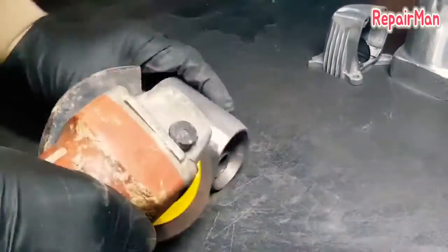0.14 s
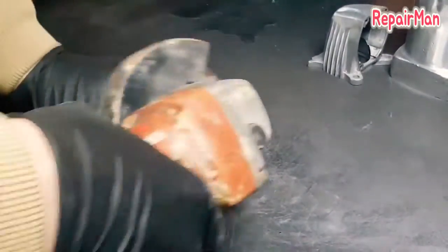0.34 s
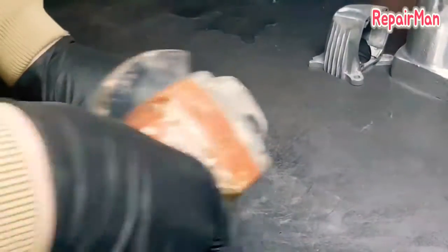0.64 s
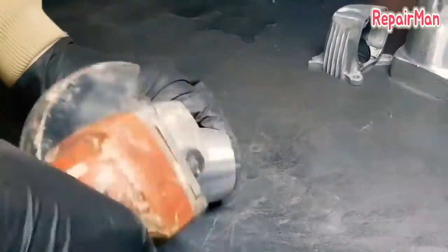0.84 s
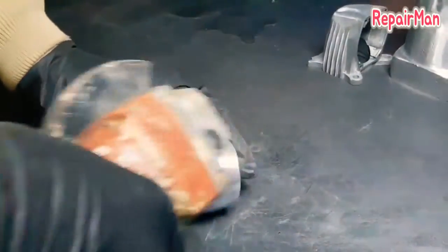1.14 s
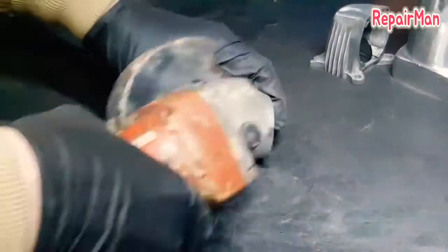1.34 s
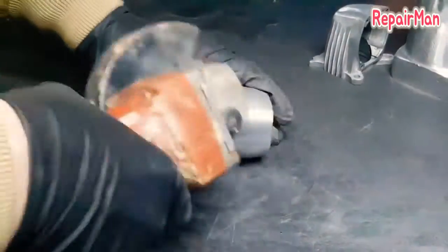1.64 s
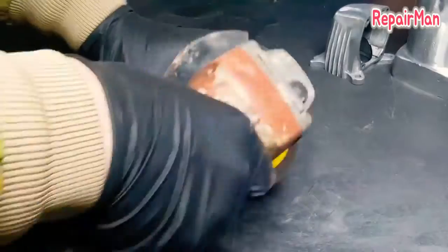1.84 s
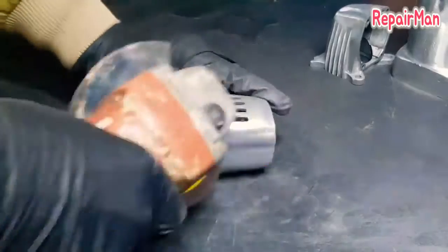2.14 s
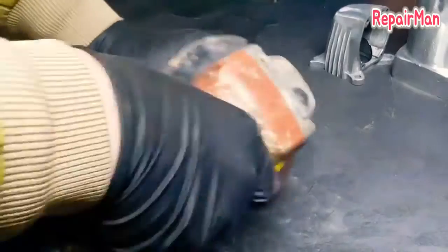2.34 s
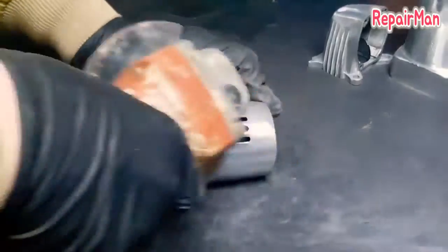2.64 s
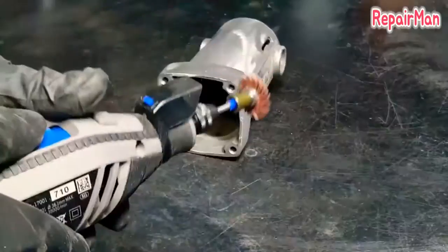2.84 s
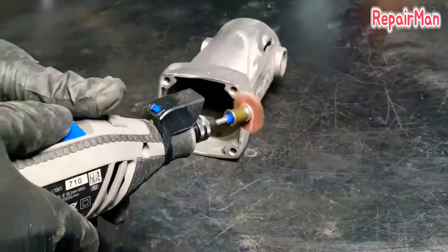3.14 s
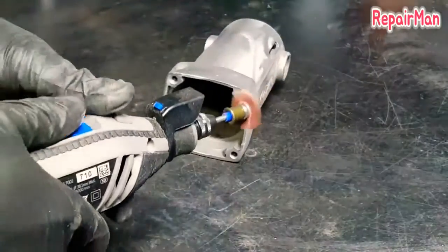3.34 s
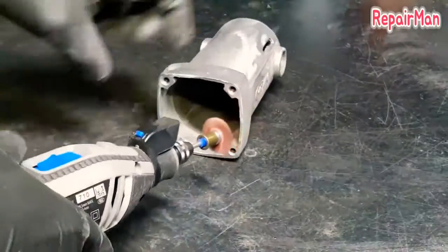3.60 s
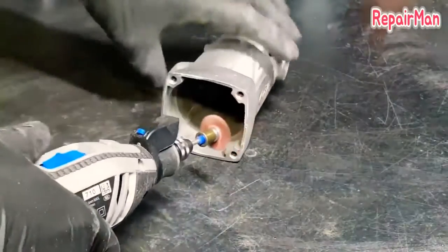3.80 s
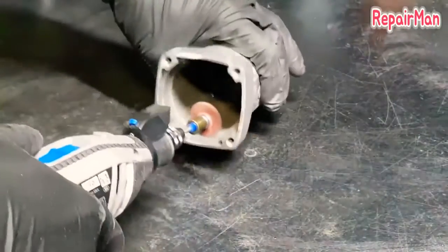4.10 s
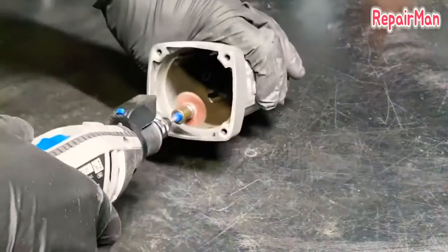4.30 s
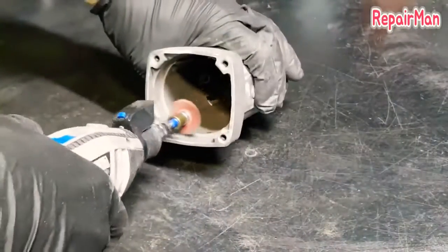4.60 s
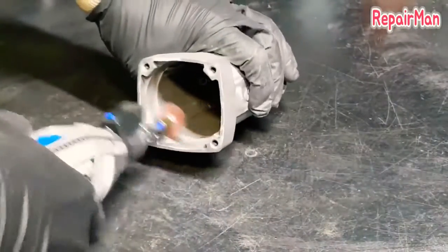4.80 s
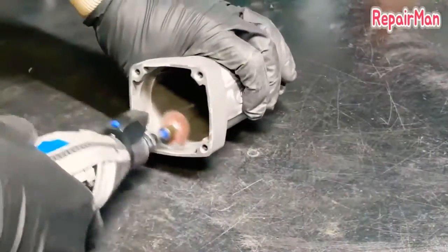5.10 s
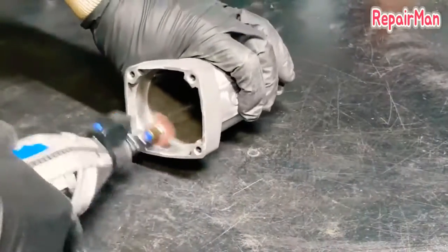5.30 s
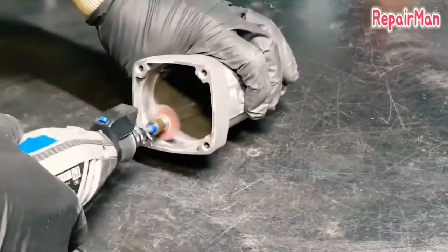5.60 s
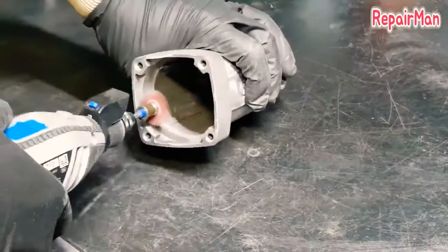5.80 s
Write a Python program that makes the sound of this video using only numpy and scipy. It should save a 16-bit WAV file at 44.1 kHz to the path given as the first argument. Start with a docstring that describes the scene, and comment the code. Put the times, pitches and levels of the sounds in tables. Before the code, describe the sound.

Harsh grinder hiss and gear whine dip and rise through repeated passes, low rumble and dull bench knocks underneath. It stops quickly near three seconds. After a crisp click, a small motor climbs from standstill, buzzing through a body resonance into steady airy running. Then a wire wheel suddenly rakes a hollow casting, bristly and metallic with a wavering whine. Close microphone pair, dry workshop.

```python
"""At a workbench, close to a pair of microphone ports, metal parts are cleaned with power tools.
An angle grinder scours a part in strokes, hiss over gear and motor lines that sag under the hand.
A low rumble, knocks and slides (coloured noise, damped rings) go on around it; the room rumbles in the pause.
A switch snaps, and a small rotary tool whistles up through a body shudder and runs free on fan air.
Abruptly its wire brush is scouring a cast housing: bristle strikes, metal resonances and a motor whine."""
import sys
import numpy as np
from scipy import signal
from scipy.fft import rfft, irfft
from scipy.io import wavfile

SR = 44100
rng = np.random.default_rng(int(sys.argv[2]) if len(sys.argv) > 2 else 0)


def store_wav(level_fs):
    """Save 16-bit WAV to argv[1]."""
    pcm = np.round(np.clip(np.atleast_2d(level_fs), -1, 1) * 32767)
    wavfile.write(sys.argv[1], SR, pcm.T.astype(np.int16))


N = 262395
T = np.arange(N) / SR
HZ = np.fft.rfftfreq(N, 1 / SR)
PAUSE_S, BRUSH_S = 2.945, 4.851  # the room is heard between these; the brushing starts at the second
PATCH_DB = 3.3  # depth setting of the random spectral patches on the three tools


def amp(db):
    """Decibels to gain."""
    return 10 ** (np.asarray(db) / 20)


def unit(x):
    """Scales to rms 1."""
    return x / np.sqrt(np.mean(abs(x) ** 2) + 1e-20)


def curve(rows):
    """A time table at every sample."""
    rows = np.array(rows)
    return np.interp(T, np.sort(rows[:, 0]), rows[:, 1])


def across(points):
    """A frequency table at every bin, joined along log frequency."""
    hz, value = np.transpose(points)
    return np.interp(np.log(HZ + 1), np.log(hz + 1), value)


def between(start, end, fade=0.0025):
    """One from start to end, with short ramps in seconds."""
    rise = np.clip((T - start) / fade + .5, 0, 1)
    fall = np.clip((end - T) / fade + .5, 0, 1)
    return rise * fall


def wander(rate_hz):
    """Slow random motion of about rms 1."""
    coarse = T[::15]
    hz = np.fft.rfftfreq(len(coarse), coarse[1])
    noise = rng.standard_normal(len(coarse))
    slow = irfft(rfft(noise) / (1 + (hz / rate_hz) ** 2), len(coarse))
    return np.interp(T, coarse, unit(slow))


def ports(pair, colour_db, same):
    """Colours two unrelated noises and blends them into a partly alike left and right; their mean has rms 1."""
    same = np.clip(same, -.9, .98)
    mid, side = (unit(irfft(rfft(x) * amp(colour_db), N)) for x in pair)
    side = irfft(rfft(side) * np.sqrt((1 - same) / (1 + same)), N)
    return np.array([mid + side, mid - side])


def above(x, hz):
    """The part of a sound above a frequency."""
    return irfft(rfft(x) / (1 + (hz / (HZ + 1)) ** 4), N)


def ringing(modes, lift_db):
    """The dB that metal resonances add to a spectrum: a peak per mode, scaled by the lift."""
    return lift_db * sum(amp(db / 2) / (1 + (2 * (HZ - hz) / width) ** 2) for hz, width, db in modes)


def bristles(per_s, spread_db, air):
    """Countless tiny strikes of random size over a bed of rushing air."""
    struck = amp(spread_db * np.minimum(rng.exponential(1, N), 4)) * (rng.random(N) < per_s / SR)
    strikes = unit(struck * rng.standard_normal((2, N)))
    return strikes + air * rng.standard_normal((2, N))


def partials(hz, rows, blur_hz, response=np.ones_like):
    """Lines locked to a rotation, each part steady and part turbulent, with its own level and phase at the ports."""
    angle, out = 2 * np.pi * np.cumsum(hz) / SR, np.zeros((2, N))
    for multiple, db, rough, pan_db, phase in rows:
        rough = np.clip(rough, 0, 1)
        turbulence = wander(blur_hz) + 1j * wander(blur_hz)
        size = np.sqrt(1 - rough) + np.sqrt(rough / 2) * turbulence
        line = amp(db) * response(multiple * hz) * size * np.exp(1j * multiple * angle)
        left_right = unit(np.array([[amp(pan_db) * np.exp(1j * phase)], [1]]))
        out += np.sqrt(2) * (line * left_right).real
    return out


def orders(rows):
    """Partials of a single shaft fall on whole multiples of its speed."""
    return [(round(multiple), *rest) for multiple, *rest in rows]


def blows(rows, colour, same, rise_s):
    """Bursts of coloured noise that swell to their moment and die away by 60 dB in t60."""
    envelope = np.zeros(N)
    for s, db, t60 in rows:
        decay = amp(db - 60 * np.maximum(T - s, 0) / t60)
        envelope = envelope + decay * np.exp(np.minimum(T - s, 0) / rise_s)
    return envelope * ports(rng.standard_normal((2, N)), across(colour), same)


def patchy(x, depth_db, patch_hz, patch_s):
    """Random narrow patches of the spectrum rise and fall."""
    hz, t, z = signal.stft(x, SR, nperseg=1024, noverlap=768)
    field = rng.standard_normal(z.shape[1:])
    for axis, span in enumerate((patch_hz / hz[1], patch_s / t[1])):
        kernel = np.exp(-.5 * (np.arange(-30, 31) / span) ** 2)
        field = np.apply_along_axis(np.convolve, axis, field, kernel, "same")
    gain = unit(amp(depth_db * unit(field)))
    return signal.istft(z * gain, SR, nperseg=1024, noverlap=768)[1][:, :N]


def right_later(x, ms):
    """Delays the right port."""
    return np.array([x[0], irfft(rfft(x[1]) * np.exp(-2j * np.pi * HZ * ms / 1000), N)])


INERTIA_S = .091  # lag of the grinder's rotor


def stroke_shape(start, end):
    """How far a stroke has taken hold, 0-1 (the rotor lags both bite and release), and the seconds in contact."""
    held = np.clip(T, start, end) - start
    bite = 1 - np.exp(-held / INERTIA_S)
    release = np.exp(-np.maximum(T - end, 0) / INERTIA_S)
    return bite * release, held


# Strokes of the disc on the part. Each row: start in seconds, end in seconds, sag of the gear whine in Hz
# before lean and wobble, change of the scouring level in dB.
STROKES = [(-.082, 0.236, 232.8, -2.5), (0.502, 1.415, 184.5, -1.5), (1.557, 2.21, 237.2, -1.5),
           (2.34, 2.892, 238.3, -1.3)]
# Motor hum of the grinder. Each row: multiple of the gear whine, level in dB before load, roughness 0-1,
# left over right in dB, phase between the ports in rad.
GRINDER_PARTIALS = [(0.2828, -63.5, 0.16, 3.5, 0.61), (.565, -59, 0.7, 0.5, 0.069)]
# The gear mesh itself. Each row: the same columns as the hum.
GEAR_MESH = [(0.99, -46.5, 0.34, 1, 0.86)]
# Colour of the scouring. Each row: frequency in Hz, relative density in dB per Hz.
GRINDER_HISS = [(90, -60), (140, -73), (210, -40), (380, -36), (470, -25.5), (560, -26), (800, -22.5),
                (1200, -13), (1790, -11), (2300, -5.5), (2770, -4.5), (3390, -1.5), (6300, -3),
                (11500, -2.5), (15500, -4)]
# Resonances of the guard. Each row: frequency in Hz, width in Hz, strength in dB, halved and then lifted.
GUARD = [(3400, 320, -9), (4370, 130, 3), (5250, 390, -3), (5620, 190, -8), (6650, 470, -7), (7930, 230, 0),
         (9720, 82, -2), (9780, 440, -2), (11400, 800, 1), (12300, 200, -5), (14000, 290, -7),
         (15000, 430, -1)]
# Likeness of the two ports. Each row: frequency in Hz, likeness from -1 to 1.
GRINDER_SAME = [(200, -0.29), (1400, 0.5), (3700, 0.21), (5300, 0.68), (5800, 0.1), (7500, 0.16),
                (8700, -0.1), (15000, -0.08)]
FREE_HZ, LEAN_HZ_PER_S = 2623, 146  # whine with no load; the hand leans in through a stroke
WOBBLE_HZ, WOBBLE_PER_S = 24, 13  # the disc rocks on the part
SCOUR_LEAN_DB_PER_S = 1.66  # scouring grows as the hand leans in
GRINDER_DB = -33.5  # scouring level before the changes of each stroke
GRINDER_END_S, GRINDER_FADE_DB_PER_S = 2.94, 673  # the quick fade into the pause


def grinder(flutter_db=0.28, rock_db=0.16, hum_load_db=2, hum_rock_db=0.5, gear_load_db=2.5,
            gear_rock_db=1.0, lift_db=-12, lift_s=0.063):
    """The disc scours; gears and motor sing louder under pressure, and the hum dips as the disc lifts off."""
    sag, level, lifted = np.zeros(N), np.full(N, float(GRINDER_DB)), np.zeros(N)
    rock = np.sin(2 * np.pi * WOBBLE_PER_S * T)
    for start, end, sag_hz, db in STROKES:
        hold, held = stroke_shape(start, end)
        sag = sag + hold * (sag_hz + LEAN_HZ_PER_S * held + WOBBLE_HZ * rock)
        level = level + hold * (db + SCOUR_LEAN_DB_PER_S * held + rock_db * rock)
        since = np.maximum(T - end, 0) / lift_s
        lifted = lifted + since ** 2 * np.exp(1 - since ** 2)
    hz = (FREE_HZ - sag) * (1 + 0.0034 * wander(33))
    grit = bristles(per_s=11000, spread_db=0, air=1.74)
    colour_db = across(GRINDER_HISS) + ringing(GUARD, lift_db=3.0)
    scour = ports(grit, colour_db, across(GRINDER_SAME))
    scour = patchy(scour, PATCH_DB, patch_hz=38, patch_s=0.03)
    scour = scour * amp(level + flutter_db * wander(22))
    # load runs from -1 to 1 around the usual sag
    working = sag[T < GRINDER_END_S]
    load = np.tanh((sag - np.median(working)) / np.std(working))
    hum_db = hum_load_db * load + hum_rock_db * rock + lift_db * lifted
    hum = partials(hz, GRINDER_PARTIALS, blur_hz=25.4) * amp(hum_db)
    gears = partials(hz, GEAR_MESH, blur_hz=29.8) * amp(gear_load_db * load + gear_rock_db * rock)
    fade = amp(-GRINDER_FADE_DB_PER_S * np.maximum(T - GRINDER_END_S, 0))
    return (scour + hum + gears) * fade


# Low rumble under the tools. Each row: time in seconds, level in dB before its lumpiness.
RUMBLE_LEVEL = [(0, -70.5), (.3, -72.5), (.68, -70), (.82, -90), (.92, -77), (1.65, -74), (1.78, -79.5),
                (2.9, -72.5), (4.9, -69.5), (5.22, -65.5), (5.36, -95), (5.5, -70), (5.94, -68)]
# Colour of the rumble. Each row: frequency in Hz, relative density in dB per Hz.
RUMBLE_COLOUR = [(60, -39), (130, -39), (200, -3), (370, 2), (540, -20), (900, -24.5)]


def low_rumble(lumpy_db=3):
    """Low coloured noise, with random changes of level and spectrum."""
    rumble = ports(rng.standard_normal((2, N)), across(RUMBLE_COLOUR), same=0.43)
    rumble = rumble * amp(curve(RUMBLE_LEVEL) + lumpy_db * wander(10))
    return patchy(rumble, 5, patch_hz=50, patch_s=.014)


# Soft knocks of parts handled on the bench. Each row: time in seconds, level in dB, pitch in Hz, t60 in seconds.
KNOCKS = [(.384, -67, 345, .08), (.544, -55, 490, 0.034), (0.586, -59, 201, 0.062),
          (1.297, -59.5, 209, 0.23), (1.563, -55, 370, .06), (1.585, -62, 210, 0.066),
          (2.341, -52, 345, 0.09), (2.35, -57.5, 200, 0.061), (5.24, -54, 240, 0.021),
          (5.406, -68, 167, 0.083)]
# Colour of the puffs. Each row: frequency in Hz, relative density in dB per Hz.
KNOCK_COLOUR = [(40, -30), (120, -13), (205, -4), (270, -1), (350, -8), (450, -4), (600, -12), (1500, -10),
                (5000, -54)]
KNOCK_RISE_S, KNOCK_PUFF_DB = 0.0062, -3  # each blow starts softly; puff relative to the ring


def knocks():
    """Each knock is one low, quickly damped ring of part and bench, with a dull puff of noise."""
    out = np.zeros((2, N))
    puff = amp(KNOCK_PUFF_DB) * ports(rng.standard_normal((2, N)), across(KNOCK_COLOUR), same=0.4)
    for s, db, hz, t60 in KNOCKS:
        decay = amp(db - 60 * np.maximum(T - s, 0) / t60)
        rise = np.exp(-(np.minimum(T - s, 0) / KNOCK_RISE_S) ** 2)
        ring = np.sqrt(2) * np.sin(2 * np.pi * hz * (T - s))
        out += decay * rise * (ring + puff)
    return out


# Parts pushed along the bench top. Each row: time in seconds, level in dB, t60 in seconds.
SLIDES = [(.5, -56.5, 0.32), (1.17, -62, .2), (1.36, -70, 0.25)]
# Colour of the slides. Each row: frequency in Hz, relative density in dB per Hz.
SLIDE_COLOUR = [(50, -18), (130, -13), (205, 4), (300, -4), (700, -13.5)]


def slides():
    """Friction along the bench top: low noise that swells and dies away."""
    return blows(SLIDES, SLIDE_COLOUR, same=0.64, rise_s=0.023)


# Colour of the room. Each row: frequency in Hz, relative density in dB per Hz.
ROOM = [(18, -62), (30, -14), (70, -1), (164, -12.5), (212, -9), (403, -16), (786, -12), (1160, -15),
        (1530, -15), (2990, -32.5), (9000, -56), (14000, -51)]
ROOM_DB = -60.5


def workshop():
    """Low room rumble as coloured noise, heard from the pause until the brushing starts."""
    rumble = ports(rng.standard_normal((2, N)), across(ROOM), same=0.76)
    return amp(ROOM_DB) * rumble * between(PAUSE_S, BRUSH_S, fade=0.013)


# The switch slider scrapes in its track around the snap. Each row: time in seconds, level in dB, t60 in seconds.
SETTLING = [(3.17, -58, 0.072), (3.194, -42.5, 0.27), (3.216, -50, 0.049)]
# Colour of the scrape. Each row: frequency in Hz, relative density in dB per Hz.
SETTLING_COLOUR = [(200, -36), (800, -12), (2000, -2), (5500, 6), (8500, 4.5), (15500, -3)]
# The switch snaps and rebounds. Each row: time in seconds, level in dB, t60 in seconds.
SWITCH = [(3.1925, -23.5, 0.011), (3.1963, -32, 0.019)]
# Colour of the snap. Each row: frequency in Hz, relative density in dB per Hz.
SWITCH_COLOUR = [(200, -47), (800, -3.5), (2000, -10.5), (5100, -10.5), (5900, 6), (6900, 1), (8000, -6),
                 (11000, -7), (15500, -13)]


def switch():
    """A sharp snap with its rebound, and the slower scrape of the slider, as noise bursts."""
    snap = blows(SWITCH, SWITCH_COLOUR, same=0.21, rise_s=0.00073)
    scrape = blows(SETTLING, SETTLING_COLOUR, same=0.078, rise_s=0.0027)
    return snap + scrape


def housing_response(hz, centre_hz=2400, width_hz=600, lift_db=3.5, low_hz=2100, high_hz=5500):
    """The plastic shell of the rotary tool radiates in one band, best near a broad resonance."""
    resonance = amp(lift_db / (1 + (2 * (hz - centre_hz) / width_hz) ** 2))
    return resonance / (1 + (low_hz / hz) ** 10) / (1 + (hz / high_hz) ** 10)


# Rotary tool from a soft start to a peak, then settling. Each row: time in seconds, shaft turns a second
# before a slight waver.
SHAFT_SPEED = [(3.27, 4), (3.34, 50), (3.4, 113), (3.46, 149), (3.5, 176), (3.515, 202), (3.55, 243),
               (3.61, 299), (3.7, 342), (3.8, 409), (3.9, 453), (3.97, 480), (4.07, 480), (4.3, 459),
               (4.85, 458)]
# Fan air colour. Each row: frequency in Hz, relative density in dB per Hz.
ROTARY_AIR = [(76, -67), (130, -31), (273, -6), (400, -12.5), (520, -11.5), (880, 0.5), (1080, -3),
              (1410, -3), (2500, -1), (3600, 0.5), (4800, -2.5), (7100, -1.5), (8400, -4.5), (10000, -5),
              (11800, -2), (15500, -6.5)]
# Likeness of the two ports. Each row: frequency in Hz, likeness from -1 to 1, held short of full.
ROTARY_SAME = [(130, .95), (290, 1), (900, 0.4), (1800, 0.9), (3000, 0.36), (4500, 0.77), (6000, .15),
               (9000, 0.17), (15000, .1)]
# Shaft hum. Each row: multiple of the shaft, level in dB at top speed, roughness 0-1, left over right in dB,
# phase between the ports in rad.
ROTARY_PARTIALS = [(1, -47, 0.029, 0, 3.4), (2, -49, 0.69, 18, 0.97), (3, -51, 0.7, 14, 0.48),
                   (16, -48.5, .6, 0, 0.89), (26, -45, 0.4, -6, 2.33)]
# Shudder of the body. Each row: the hum's columns, its level that before the resonance shapes it.
SHUDDER = [(1, -24, 0.0027, 0, 0.71)]
# Rattle within the shudder. Each row: the same columns as the shudder.
RATTLE = [(2, -54, 0.2, -7, 0), (3, -42.5, 0, 2, 0), (5, -48, .3, -20, 0)]
# Commutator whistle. Each row: the hum's columns, its level that before shell, speed and torque shape it.
COMMUTATOR = [(8, -25.5, 0.54, 0, 2.3), (16, -28.5, 0.54, 0, 2.22), (24, -38, 0.68, 1, 2.1)]
FAN_DB, FAN_KNEE_HZ = -31.5, 226  # fan air well above the knee; below the knee it falls away
SHAKE_AIR_DB = 1.5  # lift of the air while the body shakes
FAN_TREBLE_HZ, FAN_TREBLE_POWER = 5800, 0.4  # above this the air brightens with speed
STEADY_BLUR_HZ, COMMUTATOR_BLUR_HZ = 12, 190  # rate of the turbulent part of the motor lines
UNEVEN_BARS = .4  # depth of the once-a-turn throb of the commutator whistle
SPARK_FLICKER_DB = 1.5  # the carbon brushes skip, so the whistle comes in grains
ROTARY_LAG_MS = 0.12  # the tool lies to the left, so its air reaches the right port later


def rotary(critical_hz=347, critical_width_hz=22, flutter_db=0.65, torque_power=0.81, rasp_db=-43,
           rasp_power=1.15, left_db=.5):
    """The motor spins up: fan air, shaft hum, commutator whistle, and a shudder at the critical speed."""
    hz = curve(SHAFT_SPEED) * (1 + 0.00085 * wander(22.0))
    speed = hz / hz.max()
    rush = bristles(per_s=5600, spread_db=2.5, air=2.5)
    air = ports(rush, across(ROTARY_AIR), across(ROTARY_SAME))
    air = patchy(right_later(air, ROTARY_LAG_MS), PATCH_DB, patch_hz=25, patch_s=0.035)
    air = air * amp(FAN_DB + flutter_db * wander(36)) / np.sqrt(1 + (FAN_KNEE_HZ / hz) ** 4)
    treble = above(air, FAN_TREBLE_HZ)
    air = air - treble + treble * speed ** FAN_TREBLE_POWER
    hum = partials(hz, orders(ROTARY_PARTIALS), STEADY_BLUR_HZ) * speed ** 5
    # the body shakes hardest as the shaft sweeps through its resonance; the rattle keeps closer to it
    resonance = (1 + (2 * (hz - critical_hz) / critical_width_hz) ** 2) ** -.65
    shake = resonance * np.minimum(hz / critical_hz, 1) ** 2.74
    shudder = partials(hz, SHUDDER, blur_hz=30) * shake
    rattle = partials(hz, RATTLE, blur_hz=30) * shake ** 2
    # the motor draws more current the further it is below its settled speed
    torque = 2 * np.maximum(1 - hz / SHAFT_SPEED[-1][1], 0) ** torque_power
    throb = 1 + UNEVEN_BARS * np.cos(2 * np.pi * np.cumsum(hz) / SR)
    whistle = partials(hz, orders(COMMUTATOR), COMMUTATOR_BLUR_HZ, response=housing_response)
    whistle = whistle * speed * torque * throb
    whistle = whistle * unit(amp(SPARK_FLICKER_DB * wander(60)))
    # below settled speed the carbon brushes also rasp through the shell resonance
    rasp = unit(irfft(rfft(rng.standard_normal((2, N))) * housing_response(HZ + 1), N))
    rasp = rasp * amp(rasp_db) * speed * torque ** rasp_power
    tool = air * amp(SHAKE_AIR_DB * shake) + hum + shudder + rattle + whistle + rasp
    return tool * amp([[left_db], [-left_db]]) * between(SHAFT_SPEED[0][0], BRUSH_S)


# Motor under the wire brush. Each row: time in seconds, whine in Hz before a slight waver.
BRUSH_SPEED = [(4.87, 1793), (4.944, 1757), (5.128, 1762), (5.188, 1712), (5.33, 1776), (5.382, 1698),
               (5.536, 1726), (5.572, 1807), (5.582, 1850), (5.612, 1873), (5.728, 1762), (5.804, 1746),
               (5.94, 1772)]
# Scouring in the housing. Each row: time in seconds, level in dB before flutter and bite.
BRUSH_LEVEL = [(4.87, -38.5), (4.98, -37.5), (5.15, -38.5), (5.266, -38), (5.298, -40), (5.51, -38.5),
               (5.63, -43), (5.92, -40.5)]
# Lines of the motor. Each row: multiple of the whine, level in dB relative to the whine level, roughness 0-1,
# left over right in dB, phase between the ports in rad.
BRUSH_PARTIALS = [(0.624, -19.5, 0.8, 0, 0.17), (0.999, -0.5, 0.05, -10.5, 1)]
# Octave of the whine. Each row: the same columns as the motor lines.
BRUSH_OVERTONES = [(2, -1.5, 0.25, 0, 0.92)]
# Colour of the scouring. Each row: frequency in Hz, relative density in dB per Hz.
BRUSH_HISS = [(100, -73.5), (170, -33), (376, -29.5), (520, -60), (620, -38.5), (760, -18), (1100, -15),
              (1580, -16), (2000, -15), (3000, -5.5), (3600, -3), (5200, -5), (6200, -8.5), (8200, -7.5),
              (11000, -10), (14100, -6), (15500, -8.5)]
# Resonances of the casting. Each row: frequency in Hz, width in Hz, strength in dB, halved and then lifted.
HOUSING = [(4570, 360, -10), (5420, 160, -1), (6660, 270, -20), (8000, 190, -5), (8680, 180, -10),
           (9400, 180, -4), (10120, 130, 6), (11500, 76, -4), (11900, 130, -6), (14200, 700, 0)]
# Likeness of the two ports. Each row: frequency in Hz, likeness from -1 to 1.
BRUSH_SAME = [(290, 0.96), (640, 0.71), (1400, 0.73), (3100, .2), (6800, -0.1), (15000, -0.4)]
WHINE_DB, WHINE_DB_PER_HZ = -49, 0.046  # at the usual speed; it grows as the load drags the motor down
BRUSH_FLUTTER_DB, OCTAVE_WAVER_DB = .7, 1.2  # unsteadiness of the hand; the octave swells and sinks


def brush(bite=0.44, bite_hz=5500):
    """Wire tips rake the casting, brighter in firm contact, while the motor whines under load."""
    hz = curve(BRUSH_SPEED) * (1 + 0.0018 * wander(35.5))
    level = curve(BRUSH_LEVEL)
    brushing = T > BRUSH_S
    strikes = bristles(per_s=3000, spread_db=0.5, air=2.0)
    colour_db = across(BRUSH_HISS) + ringing(HOUSING, lift_db=5.0)
    scour = ports(strikes, colour_db, across(BRUSH_SAME))
    scour = patchy(scour, PATCH_DB, patch_hz=30, patch_s=0.011)
    scour = scour * amp(level + BRUSH_FLUTTER_DB * wander(10.7))
    treble = above(scour, bite_hz)
    pressure = amp(bite * (level - level[brushing].mean()))
    scour = treble * pressure + (scour - treble) / pressure
    load = amp(WHINE_DB_PER_HZ * (np.median(hz[brushing]) - hz))
    octave = partials(hz, BRUSH_OVERTONES, blur_hz=30) * unit(amp(OCTAVE_WAVER_DB * wander(8.7)))
    # the octave takes the load twice, so it grows faster than the whine
    whine = amp(WHINE_DB) * load * (partials(hz, BRUSH_PARTIALS, blur_hz=39.4) + octave * load)
    return (scour + whine) * between(BRUSH_S, np.inf)


def scene():
    """The three stretches of tool work, the low rumble, knocks and slides, the room and the switch."""
    bench = low_rumble() + knocks() + slides()
    return grinder() + bench + workshop() + switch() + rotary() + brush()


EDGE_HZ = 15830  # top of the band


def record(dry):
    """A steep band limit."""
    lowpass = signal.firwin(1023, EDGE_HZ, window=("kaiser", 9), fs=SR)
    return signal.oaconvolve(dry, lowpass[None], "same")


dry = scene()
out = record(dry)
store_wav(out)
```